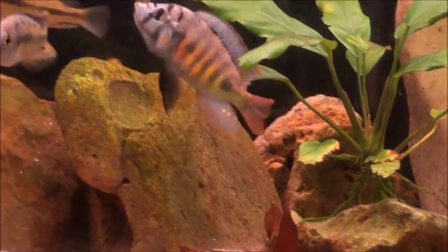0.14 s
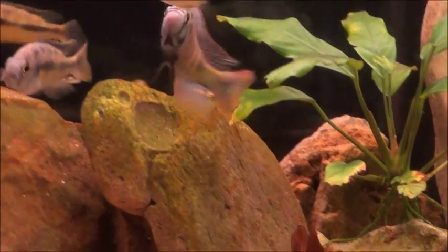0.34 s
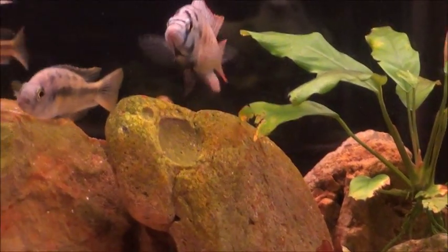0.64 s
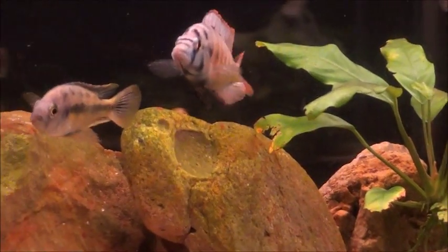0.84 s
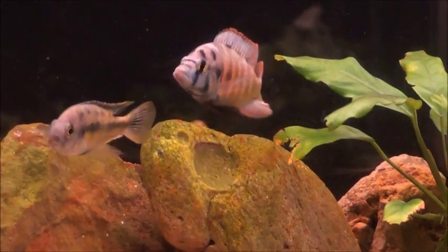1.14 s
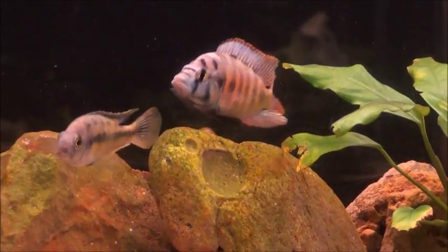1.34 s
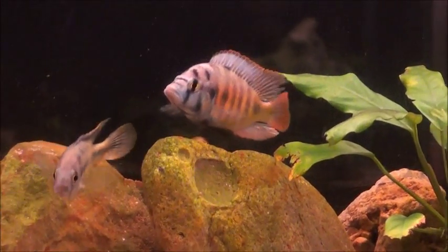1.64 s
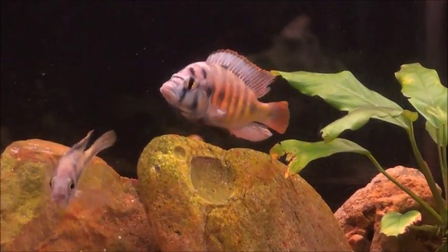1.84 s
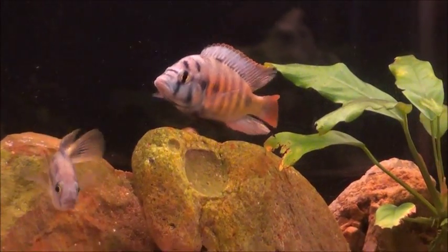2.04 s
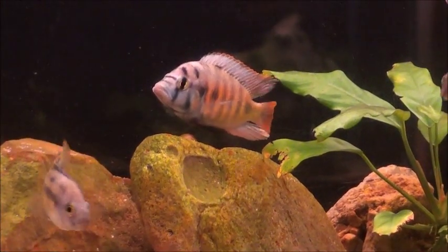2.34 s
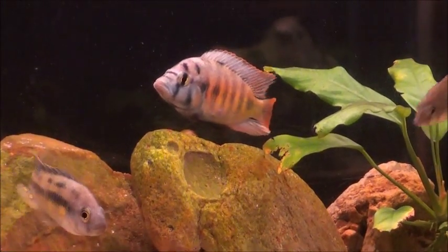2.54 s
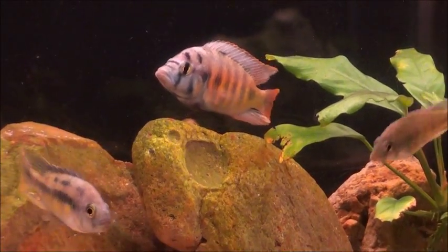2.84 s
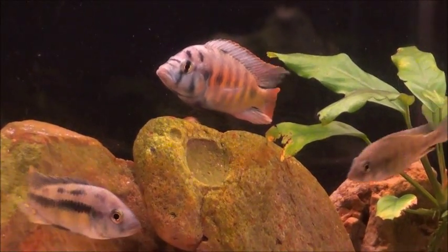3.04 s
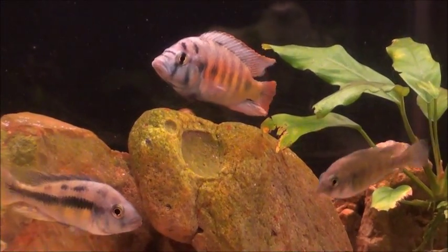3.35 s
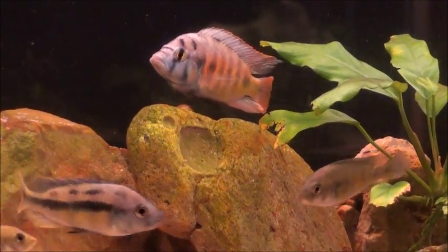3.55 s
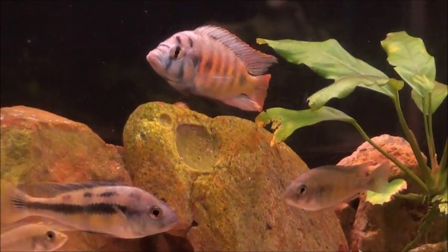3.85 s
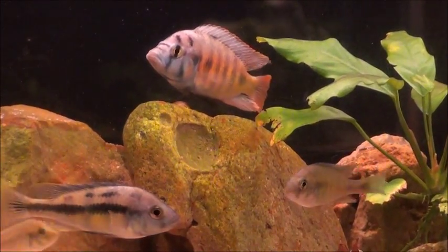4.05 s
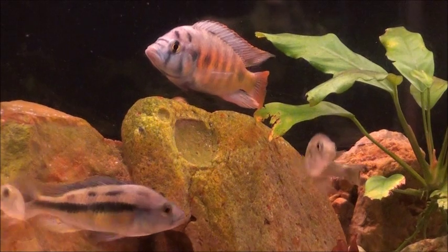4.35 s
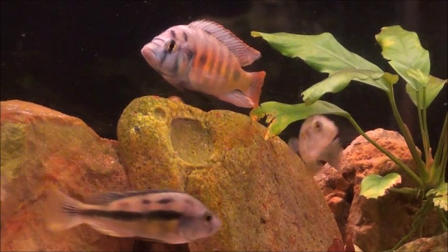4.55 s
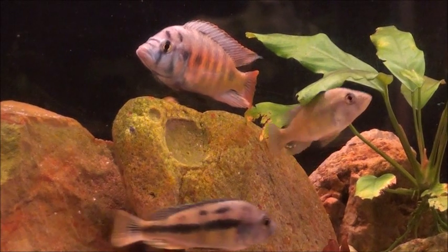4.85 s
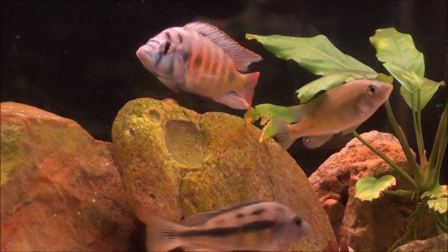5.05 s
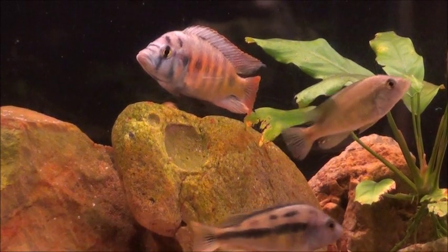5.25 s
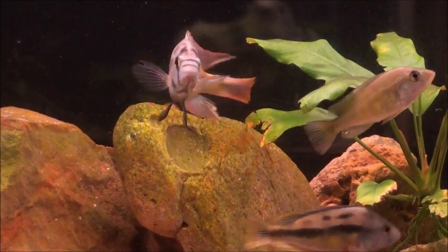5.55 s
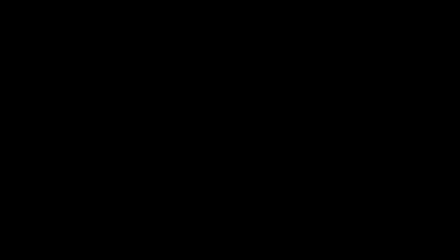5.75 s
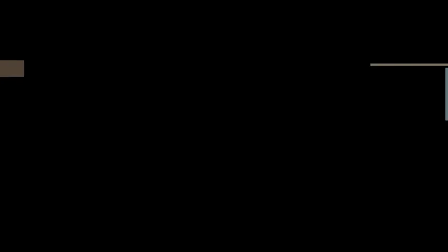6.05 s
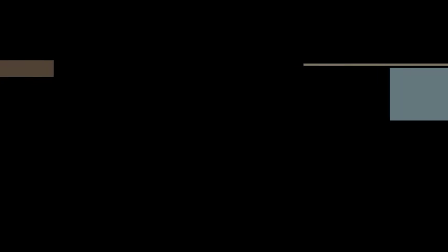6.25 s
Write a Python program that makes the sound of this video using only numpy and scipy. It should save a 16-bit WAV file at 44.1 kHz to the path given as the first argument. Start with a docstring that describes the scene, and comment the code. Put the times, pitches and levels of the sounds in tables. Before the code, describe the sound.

An aquarium filter runs in a small room, its outflow churning air into the water with a dense, low burble. A smooth hiss and a slightly hollow ring sit behind it, and the pump hums and whines faintly. Gulps of air swell the bubbling now and then, while single larger bubbles and a few brief spurts of fizz come through. Everything stops abruptly after about six seconds.

```python
"""An aquarium filter runs in a small room. From the start its outflow churns air into the water, a dense
low burble; lid air, filter box and tank ring hollow over a smooth hiss and a low rumble, and the pump
hums and whines. From 0.26 s gulps of air swell the burble, and single larger bubbles and a few spurts
of fizz come through. By 1.6 s the whine's weight has moved to its octave. All stops abruptly at 5.9 s."""
import sys
import numpy as np
from scipy import signal
from scipy.fft import rfft, irfft, next_fast_len
from scipy.io import wavfile
from scipy.ndimage import uniform_filter1d

SR = 44100
rng = np.random.default_rng(int(sys.argv[2]) if len(sys.argv) > 2 else 0)


def wav_out(sig):
    """Save sig, one row per channel (or a flat mono array), as 16-bit PCM at SR to the path in sys.argv[1]."""
    wavfile.write(sys.argv[1], SR, np.round(np.clip(np.atleast_2d(sig).T, -1, 1) * 32767).astype(np.int16))


N = 282098
TIME_S = np.arange(N) / SR
FFT_N = next_fast_len(N + SR // 2)
BINS_HZ = np.maximum(np.arange(FFT_N // 2 + 1) * SR / FFT_N, 1)

# Spectra of the noisy layers. Each row: frequency in Hz, relative density in dB.
CHURN_SPECTRUM = [(60, -54.5), (118, -16.5), (150, -1.5), (185, -4.5), (205, 1), (320, 0.5), (375, -6),
                  (450, -12), (560, -14.5), (1200, -53)]
BABBLE_SPECTRUM = [(250, -36), (400, -7), (490, -1), (720, 1), (810, -4), (980, -7.5), (1250, -12.5),
                   (2500, -37)]
HISS_SPECTRUM = [(300, -21.5), (900, 6), (1300, 4), (1700, 2.5), (2100, 1), (2900, -1), (4000, -1.5),
                 (5200, 0), (7200, 0.5), (8600, -1.5), (10000, -7.5), (12000, -15), (15800, -19.5)]
RUMBLE_SPECTRUM = [(20, -31.5), (34, -19.5), (52, -21), (62, 5), (73, -1.5), (84, 3.5), (115, 2),
                   (170, -11), (400, -31)]
MIC_NOISE_SPECTRUM = [(20, -6.5), (60, 1), (150, 4), (1000, -0.5), (9000, 5), (12000, -20), (15800, -23.5)]
# Hollow resonances. Each row: frequency in Hz, nominal width in Hz, relative level in dB.
LID_AIR_MODES = [(380.3, 6, -0.66), (414.3, 8, -0.34)]
FILTER_BOX_MODES = [(1004, 6.8, -5.5), (1047.6, 18, -4.5), (1075, 10.8, 2.5), (1124, 15, 1),
                    (1172, 12, -6.5), (1234, 9.3, -21.5)]
WATER_TANK_MODES = [(149.5, 7.6, -40), (224.8, 2.9, -44), (312, 10, -39), (1640, 35, -44)]
# Lid booms and air gulps. Each row: start in seconds, length in seconds, relative level in dB.
LID_BOOMS = [(0.006, 0.094, -28), (0.28, 0.062, -33.5), (0.692, 0.158, -26.5), (1.135, 0.062, -27.5),
             (1.852, 0.08, -30), (1.96, 0.22, -29), (2.351, 0.192, -26.5), (2.712, 0.28, -26.5),
             (3.154, 0.056, -28), (3.313, 0.048, -27), (3.408, 0.086, -29), (3.665, 0.154, -26.5),
             (4.569, 0.074, -26), (4.976, 0.152, -27), (5.196, 0.082, -28), (5.438, 0.058, -26.5)]
AIR_GULPS = [(0.26, 0.062, -20.5), (0.38, 0.037, -22), (0.55, .06, -25.5), (1.14, 0.26, -29),
             (1.87, .17, -23.5), (2.06, 0.14, -26), (2.34, .06, -29), (2.49, .11, -25), (2.68, 0.061, -22),
             (2.96, .11, -24.5), (3.29, 0.096, -25), (3.63, 0.34, -26.5), (4.14, .1, -22.5),
             (4.44, 0.12, -24.5), (4.6, 0.035, -26.5), (4.74, .13, -25.5), (4.96, 0.08, -25),
             (5.29, 0.2, -28), (5.52, 0.31, -28)]
# Slow level of the box's ring. Each row: time in seconds, relative level in dB.
BOX_RING_CURVE = [(0.0, -33), (0.01, -28.5), (0.5, -25.5), (0.68, -34), (0.73, -25), (1.48, -30),
                  (2.0, -26), (2.05, -33.5), (2.17, -24), (2.31, -34), (2.34, -26.5), (5.23, -27.5),
                  (5.67, -24), (5.85, -27.5)]
# Steady pump tones. Each row: frequency in Hz, rms level in dB.
PUMP_TONES = [(58.8, -55), (120, -47.5), (1051, -39.5), (1123, -38.5), (1388, -46), (1637, -47.5),
              (5259, -56), (5319, -53), (6241, -56)]
# Motor whine. Each row: time in seconds, then levels in dB of fundamental, octave and upper tone.
WHINE_CURVES = [(0, -40.5, -44, -40), (0.8, -36, -38, -41), (1.6, -39.5, -35, -45), (3.5, -39, -35, -50.5),
                (5.8, -42, -35.5, -51.5)]
# Side tones of the whine. Each row: offset in Hz, level in dB re the fundamental.
WHINE_SIDE_TONES = [(-59, -13), (-23, -9), (58, -17), (82, -17), (118, -16)]
# Spurts of fizz. Each row: peak time in seconds, centre in Hz, level in dB, half-length in seconds.
FIZZ_SPURTS = [(0.41, 1806, -32, 0.057), (0.468, 3720, -35.5, .08), (1.93, 1740, -31, 0.026),
               (3.246, 3620, -36, 0.1)]
# Larger bubbles. Each row: start in seconds, pitch in Hz, level in dB at decay start, t60 in seconds.
LARGE_BUBBLES = [(0.272, 280, -27, .15), (0.771, 420, -19.5, 0.33), (1.529, 700, -0.5, 0.032),
                 (1.562, 726, -19, 0.2), (1.929, 312, -13, 0.19), (1.971, 280, -18.5, .17),
                 (2.843, 408, -19, .25), (3.020, 706, -16, .08), (3.362, 890, -18, 0.093),
                 (3.523, 217, -9, 0.24), (3.968, 500, -15, 0.19), (4.149, 234, -24, 0.099),
                 (4.175, 181, -17.5, 0.19), (4.429, 165, -15.5, 0.24), (4.590, 377, -19.5, 0.23),
                 (4.975, 687, -15.5, 0.098), (5.2, 413, -16, 0.2)]
# Stereo width by frequency. Each row: frequency in Hz, side re mid in dB.
STEREO_WIDTH = [(60, -20), (160, -34.5), (350, -25), (700, -19.5), (1100, -13.5), (1900, -14.5),
                (3500, -14), (6800, -9.5), (9000, -10.5), (12000, -27.5), (15000, -32.5)]
# Phase between the microphones. Each row: frequency in Hz, left lead in radians.
LEFT_LEAD = [(100, 0), (400, -.2), (750, -.3), (1120, -.27), (1300, -.13), (2400, -.05), (2600, .28),
             (3300, 0), (4500, .1), (6300, .36), (8500, .22), (11000, 0)]
# Balance of the microphones. Each row: frequency in Hz, left re right in dB.
LEFT_BALANCE = [(60, 0.5), (110, 0.5), (200, 0.1), (380, 0.69), (700, -0.67), (1290, -2.0), (2380, 0),
                (4400, -1.0), (8120, -0.5), (15000, 0.0)]


def from_db(db):
    """Decibels to gain."""
    return 10 ** (np.asarray(db) / 20)


def unit_rms(x):
    """Scale to rms 1."""
    return x / np.sqrt(np.mean(x ** 2) + 1e-20)


def curves(rows):
    """Each column of a time table, per sample."""
    times_s, *columns = np.transpose(rows)
    return [np.interp(TIME_S, times_s, column) for column in columns]


def bin_gains(spectrum):
    """A dB spectrum as a gain per FFT bin."""
    hz, db = np.transpose(spectrum)
    return from_db(np.interp(np.log(BINS_HZ), np.log(hz), db))


def colour(x, spectrum):
    """Filter by a spectrum; rms 1."""
    return unit_rms(irfft(rfft(x, FFT_N) * bin_gains(spectrum), FFT_N)[:N])


def drift(rate_hz):
    """Slow random wander; rms 1."""
    hop, settle = 40, 2000
    pole = np.exp(-2 * np.pi * rate_hz * hop / SR)
    white = rng.standard_normal(N // hop + settle + 2)
    slow = signal.lfilter([1], [1, -2 * pole, pole * pole], white)[settle:]
    return np.interp(np.arange(N) / hop, np.arange(len(slow)), unit_rms(slow))


def resonate(x, hz, width_hz):
    """Two-pole resonance; peak gain 1."""
    radius = np.exp(-np.pi * width_hz / SR)
    zeros = np.array([1, 0, -1]) * (1 - radius ** 2) / 2
    poles = [1, -2 * radius * np.cos(2 * np.pi * hz / SR), radius ** 2]
    return signal.lfilter(zeros, poles, x + 1e-18)


def flatten(x, span_s):
    """Take out slow swells; rms 1."""
    return x / np.sqrt(uniform_filter1d(x ** 2, int(span_s * SR)) + 1e-9)


def swells(rows, attack_s, release_s):
    """Joint gain of events that rise, hold and die away."""
    power = np.zeros(N)
    for start_s, length_s, level_db in rows:
        rise = np.clip((TIME_S - start_s) / attack_s + .5, 0, 1)
        fall = np.exp(-np.clip((TIME_S - start_s - length_s) / release_s, 0, 20))
        power += (from_db(level_db) * rise * fall) ** 2
    return np.sqrt(power)


def bubble_swarm(low_hz, high_hz, per_s, q, spread_db, wash_db=9.5, pitch_count=24):
    """Randomly born bubbles ring briefly in a louder wash of turbulence."""
    born = rng.random(N) < per_s / SR
    strength = from_db(spread_db * np.minimum(rng.exponential(1, N), 3))
    kicks = born * strength * rng.choice([-1, 1], N)
    pitch_index = rng.integers(0, pitch_count, N)
    pitches_hz = np.geomspace(low_hz, high_hz, pitch_count)
    rings = sum(resonate(kicks * (pitch_index == k), hz, hz / q) for k, hz in enumerate(pitches_hz))
    return unit_rms(rings) + from_db(wash_db) * rng.standard_normal(N)


def outflow(churn_db, babble_db):
    """Big bubbles churn, smaller ones babble; gulps of air swell both."""
    gulps = swells(AIR_GULPS, attack_s=0.016, release_s=0.033) * from_db(-0.6)
    big = bubble_swarm(124.7, 523.6, per_s=800, q=24, spread_db=2.0)
    small = bubble_swarm(402, 1300, per_s=1200, q=24.6, spread_db=1.0)
    churn = flatten(colour(big, CHURN_SPECTRUM), span_s=0.073)
    babble = flatten(colour(small, BABBLE_SPECTRUM), span_s=0.049)
    churn_gain = np.hypot(from_db(churn_db + 1.1 * drift(rate_hz=9)), gulps)
    babble_gain = np.hypot(from_db(babble_db + drift(rate_hz=7.3)), 0.34 * gulps)
    return churn_gain * churn + babble_gain * babble


def hollow_ring(modes):
    """Turbulence keeps narrow resonances ringing."""
    out = np.zeros(N)
    for hz, width_hz, level_db in modes:
        band = resonate(rng.standard_normal(N), hz, 1.18 * width_hz)
        out += from_db(level_db) * unit_rms(resonate(band, hz, 4 * width_hz))
    return out


def lid_air(rest_db, boom_gain_db):
    """Two close air resonances beat under the lid and boom as bubbles burst into them."""
    booms = swells(LID_BOOMS, attack_s=0.016, release_s=0.027) * from_db(boom_gain_db)
    return np.hypot(from_db(rest_db), booms) * flatten(hollow_ring(LID_AIR_MODES), span_s=0.1)


def filter_box(gain_db, sway_db, throb_hz, throb_depth):
    """The box rings with the flow and pulses slightly with the pump."""
    level_db, = curves(BOX_RING_CURVE)
    gain = from_db(level_db + gain_db + sway_db * drift(rate_hz=9.9))
    throb = 1 + throb_depth * np.sin(2 * np.pi * throb_hz * TIME_S)
    return gain * throb * flatten(hollow_ring(FILTER_BOX_MODES), span_s=0.12)


def hiss(level_db, flutter_db, fizz_width_hz):
    """A smooth rush with brief spurts of fizz."""
    gain = from_db(level_db + flutter_db * drift(rate_hz=16))
    out = gain * colour(rng.standard_normal(N), HISS_SPECTRUM)
    for peak_s, hz, spurt_db, half_length_s in FIZZ_SPURTS:
        band = resonate(rng.standard_normal(N), hz, fizz_width_hz)
        fizz = unit_rms(resonate(band, hz, fizz_width_hz))
        envelope = np.exp(-2 * ((TIME_S - peak_s) / half_length_s) ** 2)
        out += from_db(spurt_db) * envelope * fizz
    return out


def room_rumble(level_db):
    """Steady low noise of the room."""
    return from_db(level_db) * colour(rng.standard_normal(N), RUMBLE_SPECTRUM)


def tone(hz, level_db, waver_hz=0.41, waver_db=1.27):
    """A sine wavering in pitch and level."""
    phase_rad = 2 * np.pi * np.cumsum(hz + waver_hz * drift(rate_hz=1.9)) / SR
    return np.sqrt(2) * np.sin(phase_rad) * from_db(level_db + waver_db * drift(rate_hz=3.6))


def pump_motor(whine_hz, upper_hz, whistle_hz, whine_right_db):
    """Hum and a whine with octave and side tones; an upper tone and a faint whistle fade together."""
    whine_db, octave_db, upper_db = curves(WHINE_CURVES)
    steady = sum(tone(hz, level_db) for hz, level_db in PUMP_TONES)
    octave = tone(2 * whine_hz, octave_db)
    upper = tone(upper_hz, upper_db)
    whistle = tone(whistle_hz, -46.5 + 0.4 * (upper_db - upper_db.mean()))
    whine = tone(whine_hz, whine_db) * from_db(whine_right_db * np.array([[-.5], [.5]]))
    sides = sum(tone(whine_hz + offset_hz, whine_db + db) for offset_hz, db in WHINE_SIDE_TONES)
    return steady + octave + upper + whistle + whine + sides


def mic_noise(level_db):
    """Each microphone's own steady noise."""
    whites = rng.standard_normal((2, N))
    return from_db(level_db) * np.array([colour(white, MIC_NOISE_SPECTRUM) for white in whites])


def large_bubbles(pitch_creep, swell_cycles):
    """Each bubble swells quickly, then rings down as its pitch creeps up."""
    out = np.zeros(N)
    for start_s, hz, level_db, t60_s in LARGE_BUBBLES:
        start = int(start_s * SR)
        age_s = TIME_S[:min(SR // 3, N - start)]
        swell = 1 - np.exp(-age_s * hz / swell_cycles)
        decay = from_db(level_db - 60 * age_s / t60_s)
        phase_rad = 2 * np.pi * hz * age_s * (1 + pitch_creep * age_s / t60_s)
        out[start:start + len(age_s)] += swell * decay * np.sin(phase_rad)
    return out


def room(x, t60_s, first_echo_s):
    """Diffuse reflections follow the direct sound, opposite in sign left and right."""
    decay = from_db(-60 * np.minimum(TIME_S / t60_s, 3)) * (TIME_S > first_echo_s)
    reflections = rng.standard_normal(N) * decay
    response = rfft(reflections / np.sqrt(np.sum(reflections ** 2)), FFT_N)
    side = irfft(rfft(x, FFT_N) * response * bin_gains(STEREO_WIDTH), FFT_N)[:N]
    return np.array([x + side, x - side])


def mic_pair(stereo):
    """Two close ports hear the tank at slightly different level and phase."""
    hz, lead_rad = np.transpose(LEFT_LEAD)
    phase_rad = np.interp(np.log(BINS_HZ), np.log(hz), lead_rad)
    left = np.sqrt(bin_gains(LEFT_BALANCE)) * np.exp(.5j * phase_rad)
    return irfft(rfft(stereo, FFT_N) * np.array([left, 1 / left]), FFT_N)[:, :N]


def scene():
    """Water, resonances, hiss and rumble in the room; the motor direct."""
    water = outflow(churn_db=-29.0, babble_db=-27.5)
    water += large_bubbles(pitch_creep=0.024, swell_cycles=1.5)
    box = filter_box(gain_db=-1.5, sway_db=0.7, throb_hz=60, throb_depth=0.082)
    lid = lid_air(rest_db=-36, boom_gain_db=-1.5)
    tank = hollow_ring(WATER_TANK_MODES)
    rush = hiss(level_db=-26.0, flutter_db=0.55, fizz_width_hz=650)
    rumble = room_rumble(level_db=-47.5)
    motor = pump_motor(whine_hz=2601, upper_hz=2825, whistle_hz=6127, whine_right_db=8.0)
    floor = mic_noise(level_db=-55.5)
    in_room = room(water + box + lid + tank + rush + rumble, t60_s=0.44, first_echo_s=0.025)
    return mic_pair(in_room + motor) + floor


def record(dry):
    """Abrupt stop, then a steep low-pass."""
    stop_s, fade_s, cutoff_hz = 5.868, 0.03, 15900
    gate = from_db(-50 * np.clip((TIME_S - stop_s) / fade_s, 0, 2) ** 2)
    lowpass = signal.ellip(12, .1, 90, cutoff_hz, fs=SR, output="sos")
    return signal.sosfilt(lowpass, dry * gate)


dry = scene()
out = record(dry)
wav_out(out)
```